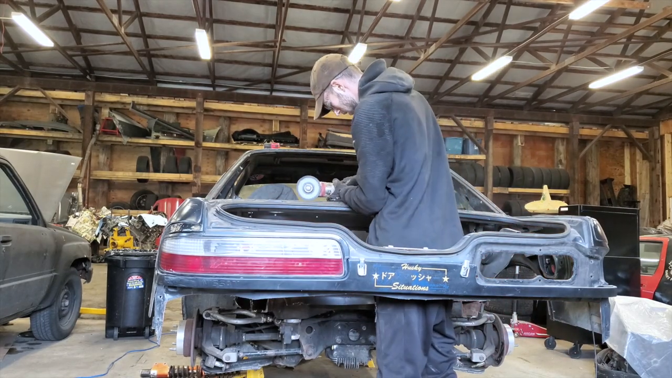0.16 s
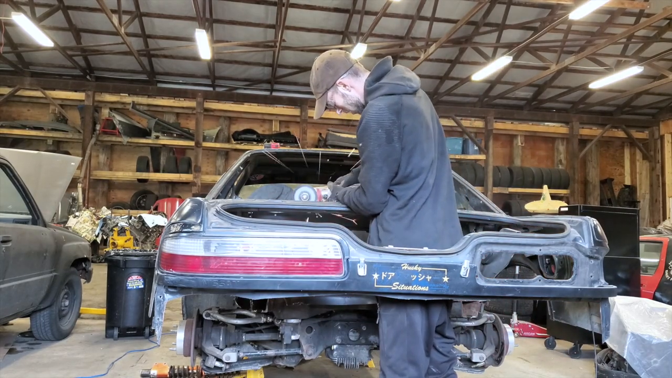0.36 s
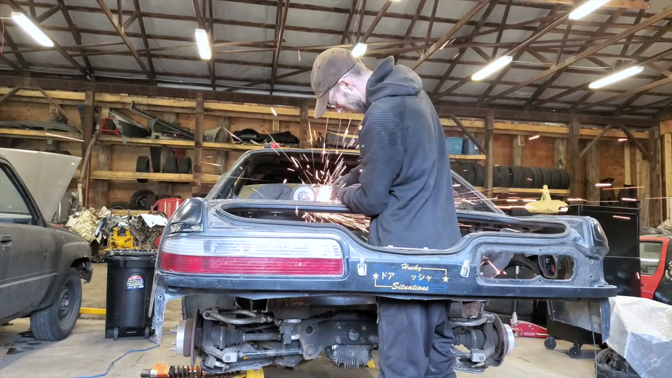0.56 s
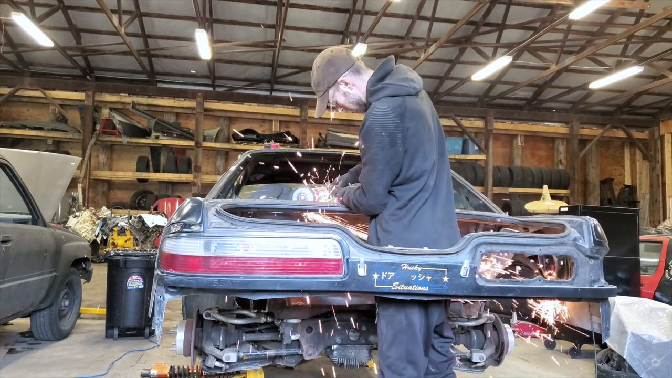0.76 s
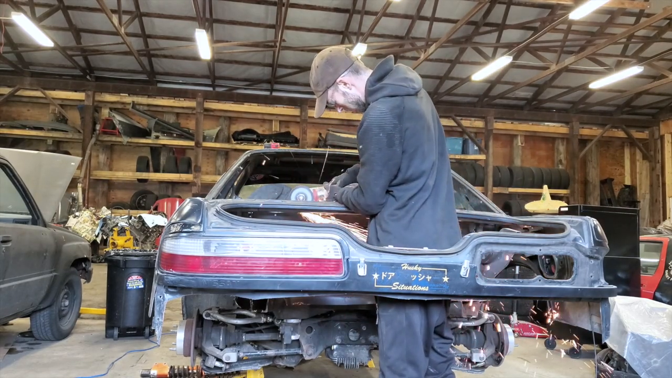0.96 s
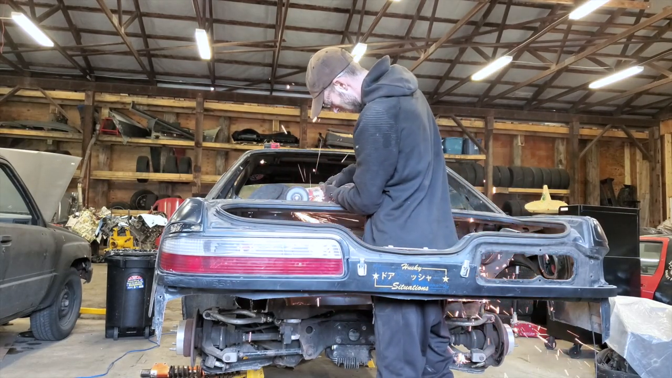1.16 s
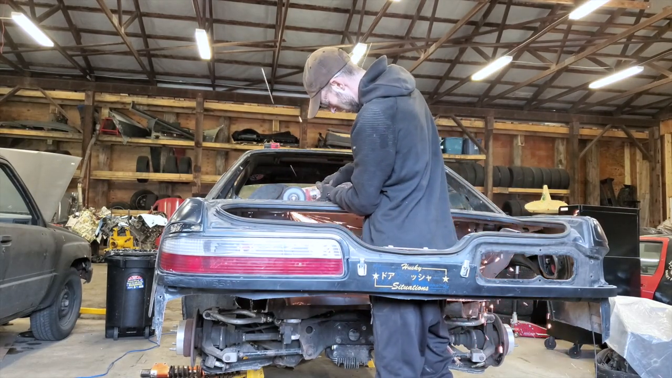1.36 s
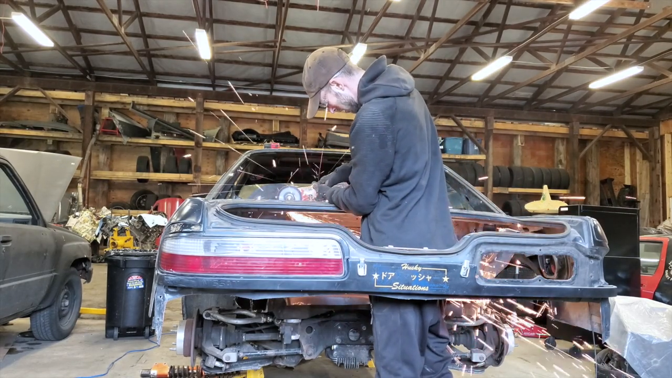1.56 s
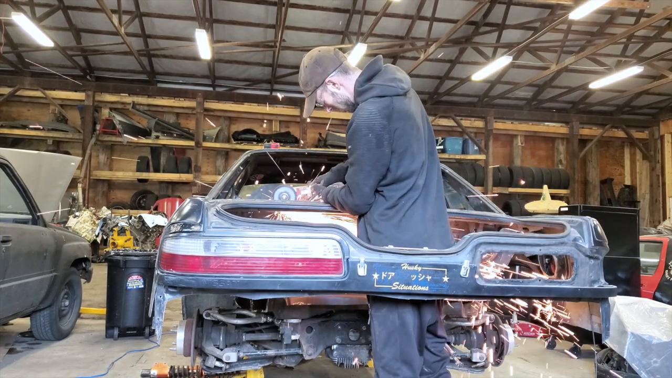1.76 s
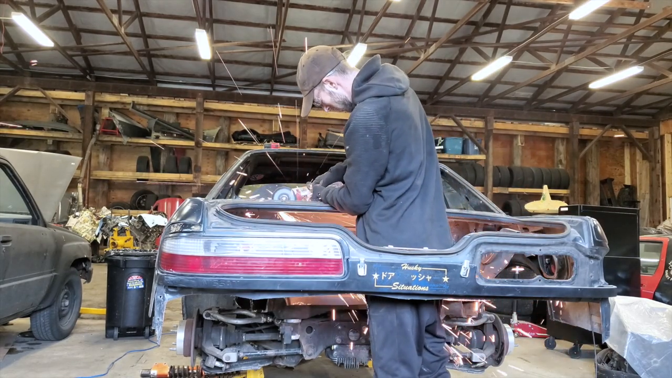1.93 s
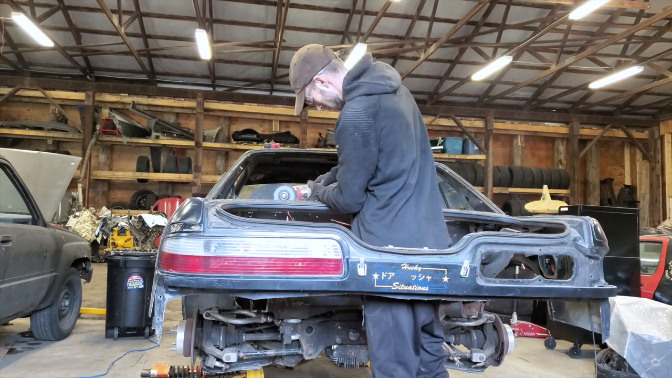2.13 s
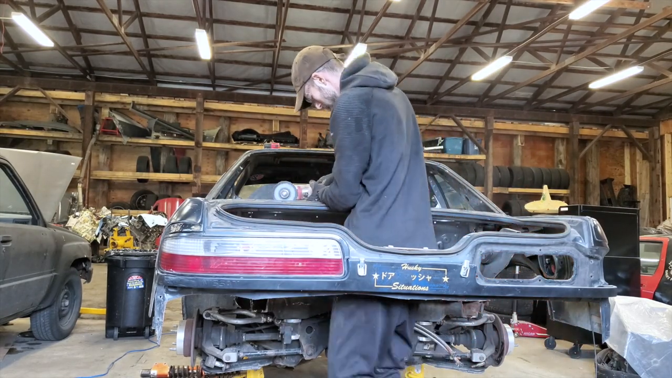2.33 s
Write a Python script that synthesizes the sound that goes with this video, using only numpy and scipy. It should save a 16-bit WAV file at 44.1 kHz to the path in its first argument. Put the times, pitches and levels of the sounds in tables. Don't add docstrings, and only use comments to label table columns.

```python
import sys
import numpy as np
from scipy import signal
from scipy.fft import rfft, irfft, next_fast_len
from scipy.io import wavfile
from scipy.ndimage import uniform_filter1d, map_coordinates

SR = 44100
rng = np.random.default_rng(int(sys.argv[2]) if len(sys.argv) > 2 else 0)


def int16_out(signal):
    q = np.round(np.clip(np.atleast_2d(signal).T, -1, 1) * 32767)
    wavfile.write(sys.argv[1], SR, q.astype(np.int16))


def undo_db(level):
    steps = np.asarray(level, float) / 20
    return 10 ** steps


N = 105840

# f/Hz, width/Hz, level/dB
GUARD = [(8880, 260, 3.5), (9890, 410, 7.5), (4920, 55, -9)]


def unit(x):
    return x / np.sqrt(np.mean(x ** 2) + 1e-20)


def along(points, hz):
    f, value = np.transpose(points)
    return np.interp(np.log(hz + 1), np.log(f + 1), value)


def curves(rows, size=1):
    s, *columns = np.transpose(rows)
    t = np.arange(N) / SR
    return [uniform_filter1d(np.interp(t, s, c), size, mode="nearest") for c in columns]


def wobble(rate):
    step = np.arange(0, N + 32, 32)
    knots = rng.standard_normal(600)
    return np.interp(np.arange(N), step, map_coordinates(knots, [step * np.clip(rate, 0, 240) / SR]))


def filtered(x, response):
    m = next_fast_len(N + SR // 2)
    return irfft(rfft(x, m) * response(np.fft.rfftfreq(m, 1 / SR)), m)[..., :N]


def noise(spectrum, patchy_db):
    z = signal.stft(rng.standard_normal(N), nperseg=512)[2]
    field = rng.standard_normal(z.shape)
    field = uniform_filter1d(uniform_filter1d(field, 6, 0), 8, 1)
    x = signal.istft(z * undo_db(patchy_db * unit(field)), nperseg=512)[1][:N]
    return unit(filtered(x, lambda hz: undo_db(along(spectrum, hz))))


def ringing(x, modes, db):
    def response(f):
        rings = sum(undo_db(g) * 1j * f * w / (c * c - f * f + 1j * f * w) for c, w, g in modes)
        return 1 + undo_db(db) * rings
    return filtered(x, response)


def shaft():
    # t/s, f/Hz (turns a second)
    run_up = [
        (0, 552.2),
        (.16, 441.4),
        (.195, 424),
        (.25, 546),
        (.31, 601),
        (.39, 624.5),
    ]
    pushes = [(.46, 638), (.55, 619), (.6, 590), (.69, 540), (.77, 512), (.83, 499), (.89, 537), (.93, 562),
              (.965, 560),
              (.99, 536), (1.055, 535), (1.1, 492), (1.145, 460), (1.195, 456), (1.235, 493), (1.325, 528),
              (1.36, 522), (1.395, 505),
              (1.43, 527), (1.485, 530), (1.53, 551), (1.64, 491), (1.75, 490), (1.82, 456), (1.875, 438),
              (1.915, 443), (1.97, 463)]
    lift = [
        (2.02, 466.2),
        (2.081, 454.5),
        (2.16, 456.3),
        (2.271, 613),
        (2.4, 633),
    ]
    wander, slip_s = .001, .005
    hz = curves(run_up + pushes + lift, size=1100)[0]
    slip = slip_s * np.gradient(hz) * SR * wobble(120)
    hz = hz * (1 + wander * wobble(39.8)) + slip
    return hz, 2 * np.pi * np.cumsum(hz) / SR


def struck_panel(hz, angle):
    # f/Hz, level/dB
    strike = [(1000, -20.5), (1500, -17.5), (3000, -12), (6000, -7.5), (9000, -1), (12000, -4), (16000, -2)]
    # f/Hz, width/Hz, level/dB
    panel = [(1800, 180, -2.5), (2463, 16, 7), (2715, 120, -0.5), (3227, 11, -3), (3680, 20, 5),
             (4080, 15, -8), (4326, 15, 5), (7610, 51, -2), (8330, 87, -10.5)]
    orders = 0
    for k in range(2, 37):
        rate = 32 + 1.4 * k
        phase = k * angle + rng.uniform(0, 2 * np.pi) + 1.1 * wobble(rate)
        level_db = along(strike, k * hz) + 4 * wobble(rate)
        orders = orders + undo_db(level_db) * (k * hz < 17000) * np.sin(phase)
    strikes = ringing(orders, panel, 5.5)
    steady_s = .045
    power = abs(uniform_filter1d(strikes ** 2, round(steady_s * SR)))
    return strikes / np.sqrt(power + 1e-9), panel


def rim_grit(angle, share, panel):
    # f/Hz, level/dB per Hz
    colour = [(110, -66), (260, -40.5), (850, -15.5), (2500, -13), (6600, -6.5), (8500, -5.5),
              (10200, -12.5), (12500, -10.5), (16000, -26)]
    pulse = 1 + .7 * np.cos(angle)
    grit = unit(ringing(noise(colour, patchy_db=2.5) * pulse, panel + GUARD, 3))
    edges_hz = np.array([[1300], [6500]])
    low, below = filtered(grit, lambda f: 1 / (1 + (f / edges_hz) ** 4))
    middle = (below - low) / np.sqrt(1 + (.45 * share) ** 2)
    return grit - below + middle + low * np.minimum(share, 1)


def cut(hz, angle, chatter_db):
    # t/s, level/dB
    pressure = [(.18, -55), (.2, -40.5), (.25, -29), (.31, -24), (.382, -24), (0.391, -15.5),
                (0.408, -16.5), (.418, -22), (.428, -18.5), (.485, -18), (.515, -22.5), (.525, -19.5),
                (0.699, -20.5), (.9, -24.5), (1.16, -22.5), (1.25, -24), (1.55, -26.5), (1.75, -26.5),
                (1.84, -25.5), (1.92, -25.5), (2.1, -27), (2.14, -28.5), (2.17, -36), (2.22, -47)]
    # t/s, regular strikes over grit/dB
    seated = [(.37, -18), (.39, -4), (.51, -1), (.56, 7), (.7, 8), (.82, 14), (.86, 2), (1.05, 6),
              (1.18, 12), (1.24, 6), (1.46, 12), (1.58, 7), (1.68, 16), (1.8, 10), (1.93, 9), (2, 15),
              (2.13, 14), (2.17, -8)]
    # t/s, level/dB
    imbalance = [(.2, -86), (.4, -48), (.62, -46), (.7, -50.5), (.9, -46), (1.1, -50), (1.17, -75),
                 (1.27, -46), (1.52, -51.5), (1.6, -47), (1.78, -60), (2.2, -67)]
    pressure_db, shake_db = curves(pressure, size=150)[0], curves(imbalance)[0]
    share = undo_db(curves(seated)[0])
    touch_s = [pressure[0][0], pressure[1][0], pressure[-1][0], pressure[-1][0] + 0.024]
    touch = np.interp(np.arange(N) / SR, touch_s, [0, 1, 1, 0])
    strikes, panel = struck_panel(hz, angle)
    grit = rim_grit(angle, share, panel)
    mix = (share * strikes + grit) / np.sqrt(1 + share ** 2)
    shake = undo_db(shake_db + 4.4 * wobble(29.73)) * np.sin(angle + rng.uniform(0, 2 * np.pi))
    return touch * (undo_db(pressure_db + chatter_db) * mix + shake)


def squeals(angle):
    # t/s, length/s, shaft order, level/dB
    low_squeals = [(0.391, 0.092, 4, -28), (0.416, 0.085, 5, -28.5), (0.421, 0.045, 9, -24.5),
                   (0.426, 0.082, 8, -32), (0.441, 0.029, 7, -22), (0.491, 0.056, 4, -27.8),
                   (0.53, 0.105, 3, -33.8), (0.555, 0.051, 9, -27), (0.57, 0.081, 7, -28.5),
                   (0.595, 0.094, 5, -33.5), (0.605, 0.078, 8, -32), (0.625, 0.056, 6, -29.5),
                   (0.635, 0.07, 9, -30.5), (0.665, 0.086, 5, -39.5), (0.71, 0.034, 7, -27),
                   (0.745, 0.038, 8, -29), (0.865, 0.05, 7, -35.5), (0.875, 0.11, 5, -41.5),
                   (0.954, 0.035, 8, -37), (1.039, 0.039, 7, -27.5), (1.079, 0.044, 5, -33),
                   (1.109, 0.096, 6, -33.4), (1.134, 0.042, 8, -29), (1.154, 0.064, 7, -29),
                   (1.194, 0.047, 8, -33), (1.244, 0.053, 5, -35.5), (1.309, 0.059, 7, -32.5),
                   (1.359, 0.08, 10, -34), (1.364, 0.049, 5, -30), (1.438, 0.06, 7, -30.5),
                   (1.443, 0.081, 4, -37.5), (1.483, 0.096, 5, -27.5), (1.493, 0.064, 8, -38),
                   (1.623, 0.048, 5, -27), (1.653, 0.095, 9, -25.5), (1.658, 0.055, 10, -33),
                   (1.688, 0.064, 5, -35), (1.718, 0.066, 10, -35.9), (1.778, 0.082, 6, -33.5),
                   (1.788, 0.029, 8, -30), (1.793, 0.05, 4, -33.5), (1.822, 0.051, 9, -30),
                   (1.847, 0.095, 10, -30.5), (1.912, 0.02, 9, -29), (1.927, 0.13, 9, -35.0),
                   (1.967, 0.043, 6, -44), (2.057, 0.057, 6, -29.5), (2.062, 0.075, 7, -38)]
    # t/s, length/s, shaft order, level/dB
    high_squeals = [(0.366, 0.022, 26, -52), (0.396, 0.087, 13, -23.5), (0.406, 0.13, 14, -21.5),
                    (0.416, 0.035, 12, -26.8), (0.446, 0.065, 16, -23), (0.451, 0.035, 24, -33),
                    (0.505, 0.115, 17, -25.5), (0.51, 0.036, 25, -47), (0.61, 0.033, 13, -19),
                    (0.645, 0.096, 14, -23.5), (0.65, 0.045, 24, -30), (0.655, 0.085, 25, -40),
                    (0.68, 0.029, 28, -43), (0.69, 0.066, 16, -31), (0.79, 0.041, 29, -33.2),
                    (0.925, 0.052, 18, -28), (0.94, 0.037, 14, -26), (0.989, 0.085, 19, -40),
                    (1.119, 0.057, 28, -29), (1.129, 0.043, 12, -26), (1.134, 0.046, 26, -29),
                    (1.269, 0.11, 16, -28.2), (1.324, 0.071, 26, -32.1), (1.418, 0.071, 26, -34),
                    (1.423, 0.064, 27, -27), (1.498, 0.16, 15, -35.5), (1.503, 0.07, 26, -32),
                    (1.508, 0.048, 25, -39), (1.598, 0.039, 17, -25), (1.613, 0.033, 24, -24.5),
                    (1.623, 0.046, 26, -43), (1.653, 0.11, 24, -33.5), (1.798, 0.063, 23, -26),
                    (1.897, 0.085, 18, -34), (2.042, 0.1, 19, -33.5), (2.067, 0.04, 25, -29.5)]
    # t/s, level/dB
    third_whine = [(0, -49), (.1, -61.5), (.2, -59), (.25, -45.5), (.32, -43), (.45, -46), (.6, -47),
                   (.75, -53), (1, -43.5), (1.2, -62), (1.55, -45), (1.8, -56.5), (2.1, -48.5),
                   (2.16, -48.5), (2.19, -73), (2.24, -50), (2.29, -57.5), (2.4, -58)]
    edge_s = .014
    out, flutter = np.zeros(N), undo_db(-2 + 2.2 * wobble(70))
    rows = list(low_squeals) + list(high_squeals)
    for (s, length, order, db), turn in zip(rows, rng.uniform(0, 2 * np.pi, len(rows))):
        t = np.arange(round((length + edge_s) * SR)) / SR
        to_end = np.minimum(t, t[-1] - t)
        shape = np.sin(np.pi / 2 * np.clip(to_end / (2 * edge_s), 0, 1)) ** 2
        start = round((s - edge_s / 2) * SR)
        span = slice(start, start + len(t))
        out[span] += np.sqrt(2) * undo_db(db) * shape * np.sin(round(order) * angle[span] + turn)
    third = np.sqrt(2) * undo_db(curves(third_whine)[0] + 1.3 * wobble(30.5)) * np.sin(3 * angle)
    return flutter * out + third


def motor(angle):
    # shaft order, level/dB over the fan
    whine = [(1, -41.5)]
    # f/Hz, level/dB per Hz
    fan = [(250, -61), (450, -32), (1200, -23), (1450, -15), (3500, -9), (8000, -5.5), (11500, -5.5),
           (14000, -7), (16000, -6.5)]
    lines = sum(undo_db(db + 5 * wobble(9.8)) * np.sin(k * angle) for k, db in whine)
    blow = unit(ringing(noise(fan, patchy_db=-0.5), GUARD, 0))
    return undo_db(-34.5 + 2.5 * wobble(25.2)) * (blow + lines)


def bumps():
    # t/s, level/dB
    knocks = [
        (.325, -62),
        (.409, -59),
        (.479, -59),
        (1.599, -70),
        (1.839, -74),
        (2.139, -75),
    ]
    bump_s = 0.0055
    out, u = np.zeros(N), np.arange(SR // 20) / SR / bump_s
    for s, db in knocks:
        out[round(s * SR):][:len(u)] += undo_db(db - 10) * u * (2 - u) * np.exp(-u)
    return out


def ports(mid, other):
    # f/Hz, side over mid/dB
    width = [(60, -18), (550, -29), (1400, -17.5), (2800, -3.5), (9000, -5), (14000, 1)]
    shared, lean_rad, pan_db = 0.36, 0.61, 0.04
    weights = np.array([[shared * 1j * np.exp(1j * lean_rad)], [np.sqrt(1 - shared ** 2)]])
    side = filtered(np.array([mid, other]), lambda hz: undo_db(along(width, hz)) * weights).sum(0)
    return np.array([mid + side, mid - side]) * undo_db([[pan_db], [-pan_db]])


def shed(x):
    # f/Hz, t60/s
    decay = [(300, 1), (3000, 0.81), (14000, 0.033)]
    hz, t, z = signal.stft(rng.standard_normal((2, SR // 2)), SR, nperseg=256)
    tail = signal.istft(z * undo_db(-60 * t / along(decay, hz)[:, None]), SR, nperseg=256)[1]
    late = np.pad(x, (600, 0))[None]
    return signal.fftconvolve(late, tail / np.linalg.norm(tail[0]), axes=1)[:, :N]


def rumble():
    # f/Hz, level/dB per Hz
    floor = [(12, -54), (20, -42), (80, -17.5), (250, -1), (305, 8.5), (330, 1), (500, -3.5), (650, -60),
             (1100, -120)]
    return noise(floor, patchy_db=1) + .3 * noise(floor, patchy_db=1) * np.array([[1], [-1]])


def scene():
    hz, angle = shaft()
    chatter_db = 1.9 * np.tanh(3 * wobble(85))
    tool, other = (motor(angle) + cut(hz, angle, chatter_db) + squeals(angle) for _ in range(2))
    return ports(tool, other) + undo_db(-20) * shed(tool) + undo_db(-66.5) * rumble() + bumps()


def top_cut(x):
    return signal.sosfilt(signal.butter(12, 16790, fs=SR, output="sos"), x)


def record(dry):
    top_hz = 15850
    mix = filtered(dry, lambda hz: hz < top_hz)
    return top_cut(mix)


dry = scene()
out = record(dry)
int16_out(out)
```